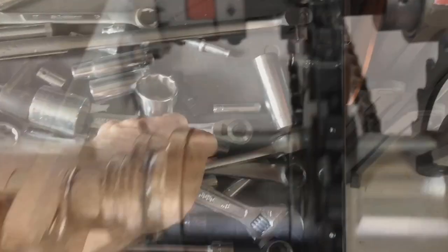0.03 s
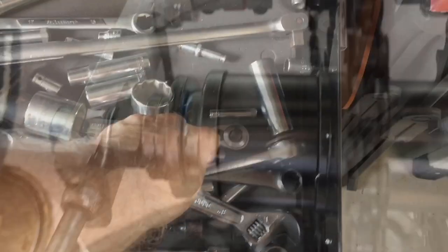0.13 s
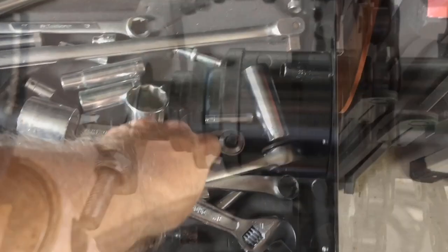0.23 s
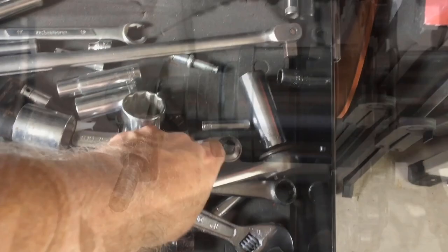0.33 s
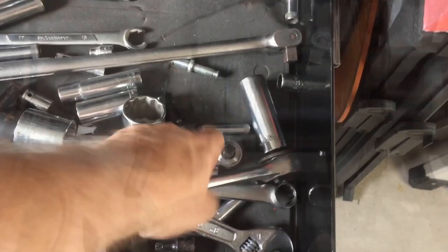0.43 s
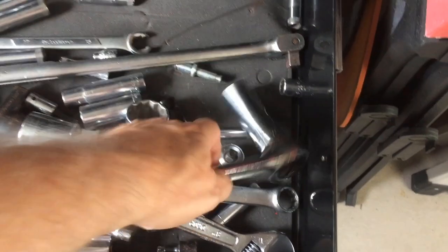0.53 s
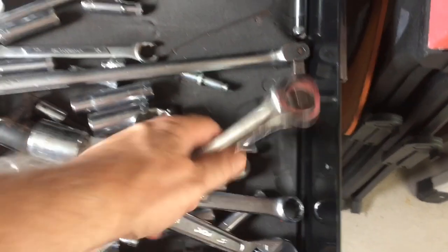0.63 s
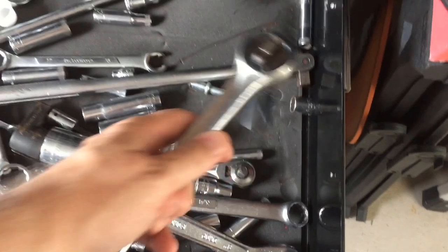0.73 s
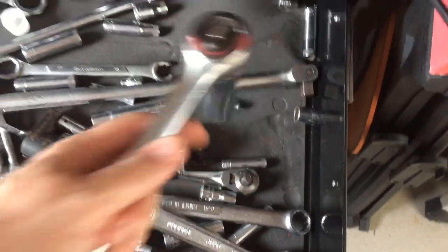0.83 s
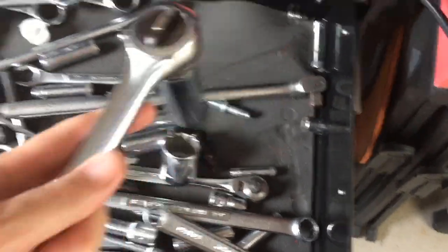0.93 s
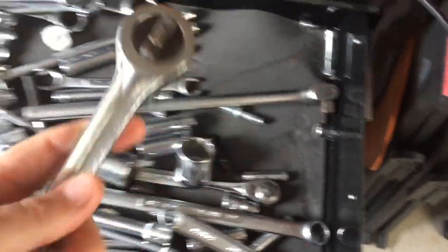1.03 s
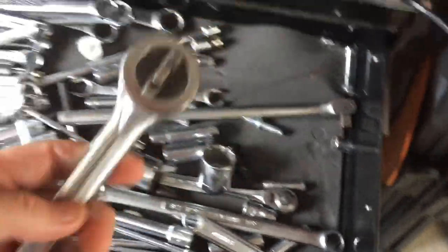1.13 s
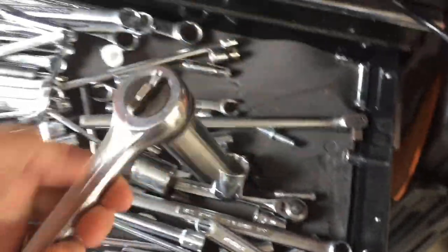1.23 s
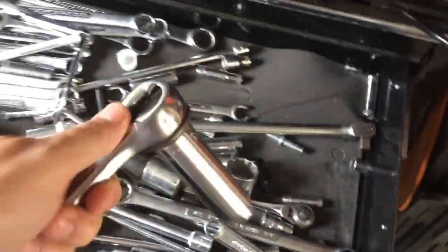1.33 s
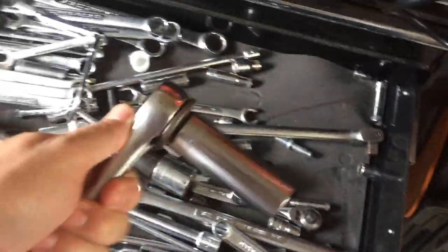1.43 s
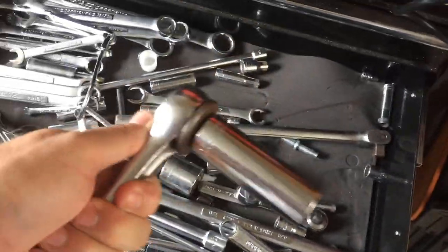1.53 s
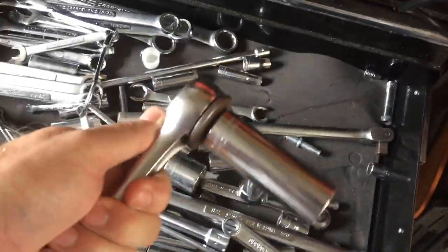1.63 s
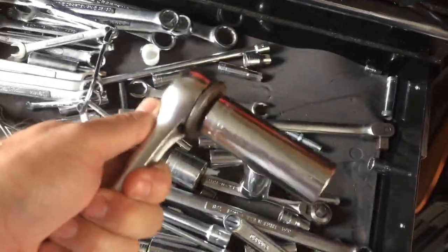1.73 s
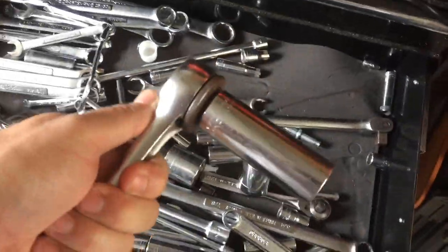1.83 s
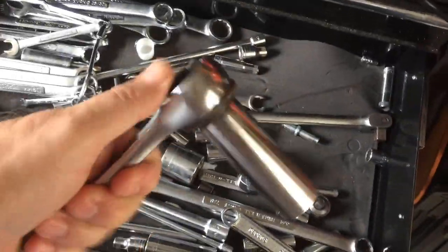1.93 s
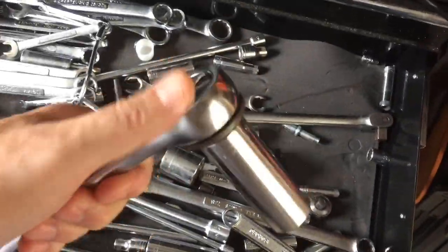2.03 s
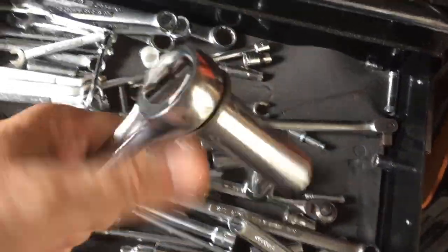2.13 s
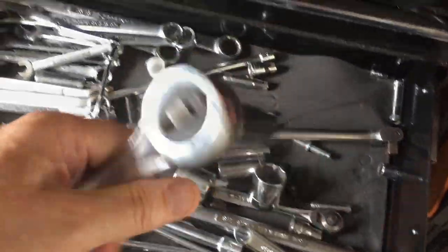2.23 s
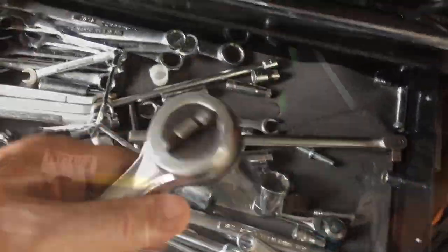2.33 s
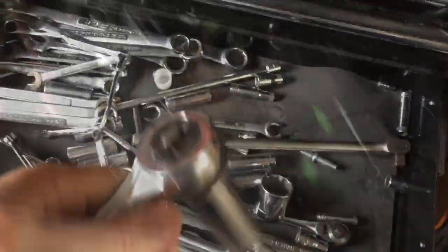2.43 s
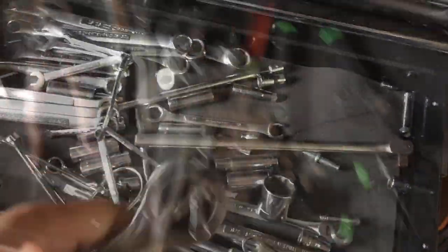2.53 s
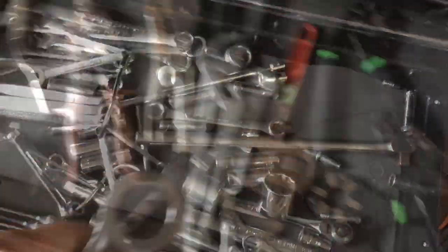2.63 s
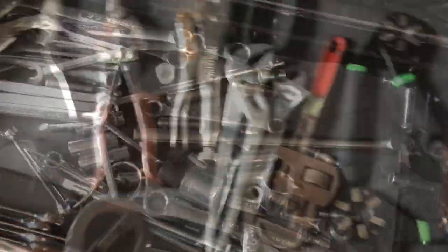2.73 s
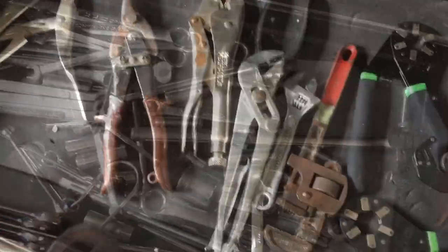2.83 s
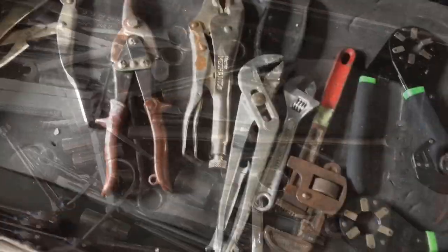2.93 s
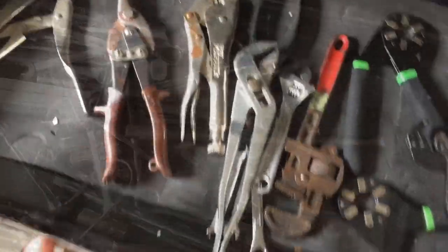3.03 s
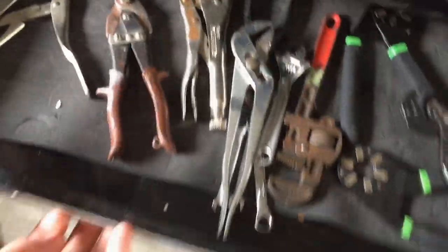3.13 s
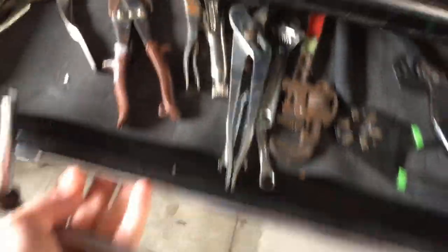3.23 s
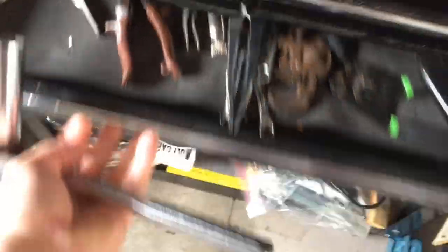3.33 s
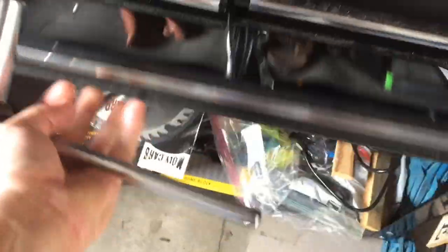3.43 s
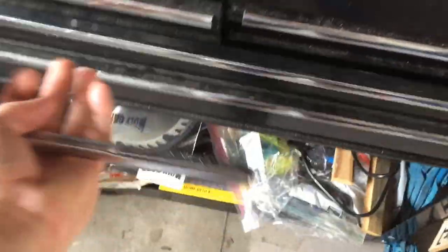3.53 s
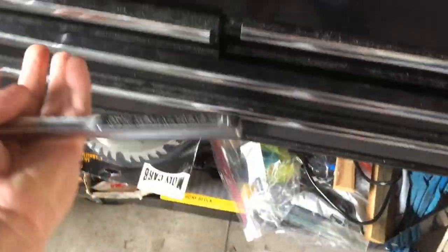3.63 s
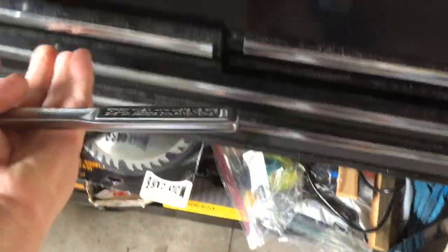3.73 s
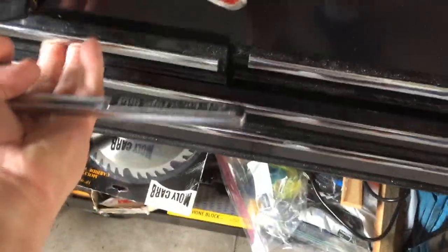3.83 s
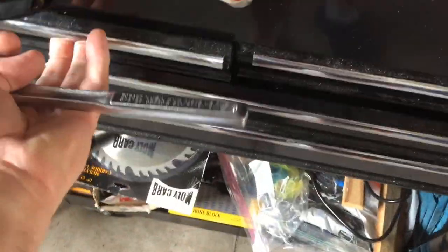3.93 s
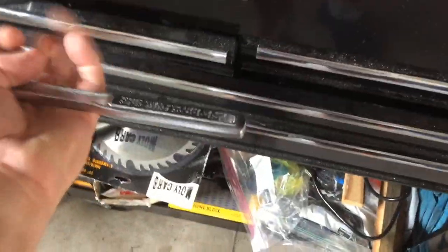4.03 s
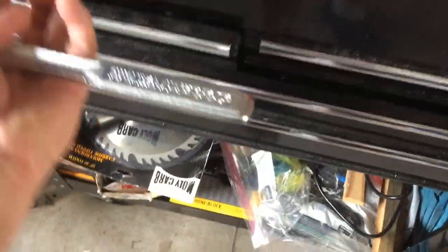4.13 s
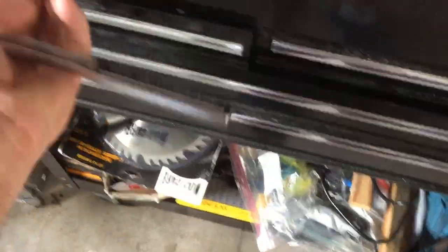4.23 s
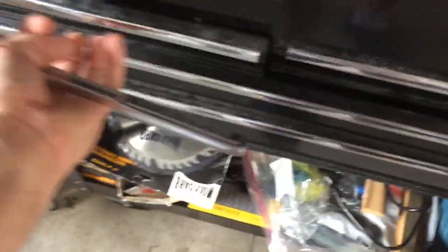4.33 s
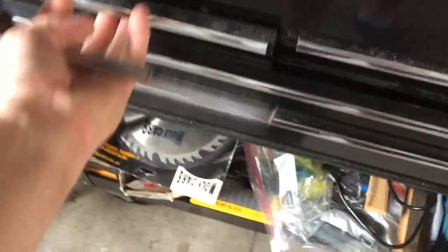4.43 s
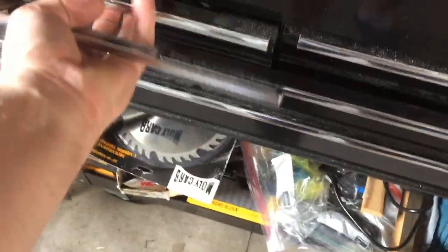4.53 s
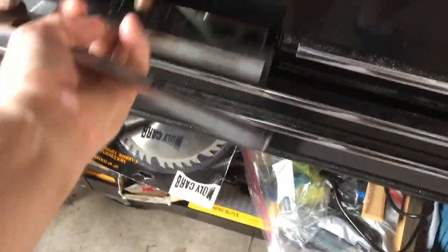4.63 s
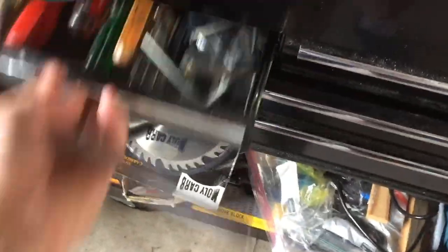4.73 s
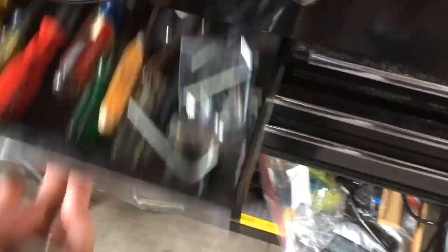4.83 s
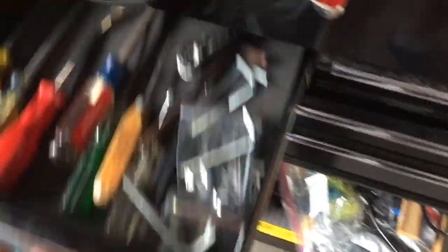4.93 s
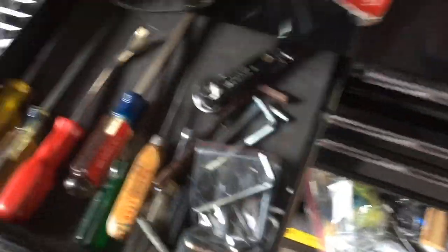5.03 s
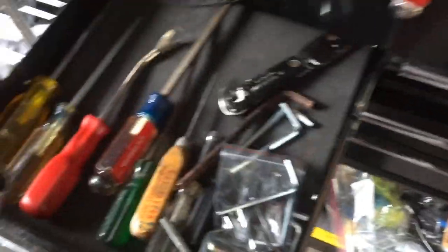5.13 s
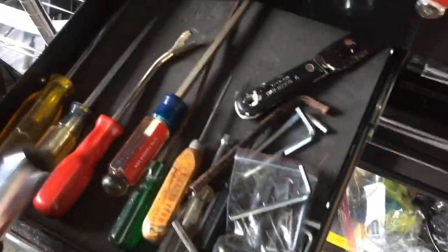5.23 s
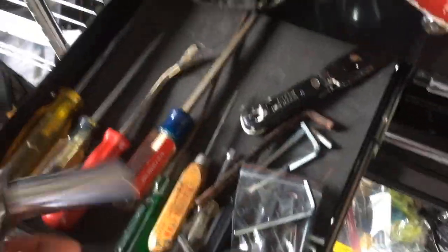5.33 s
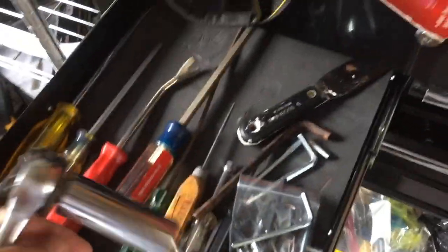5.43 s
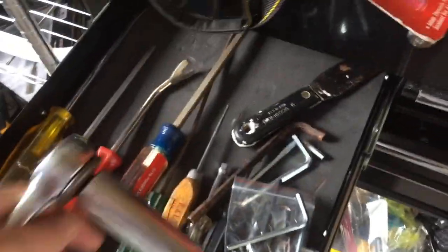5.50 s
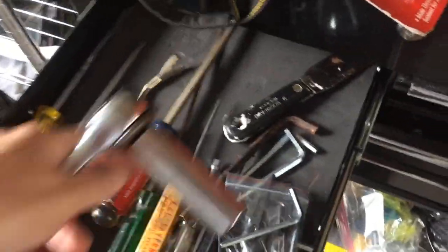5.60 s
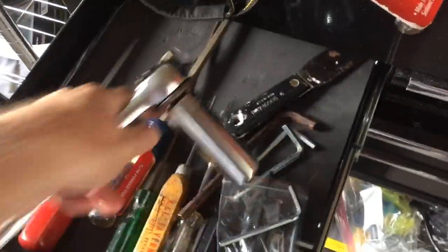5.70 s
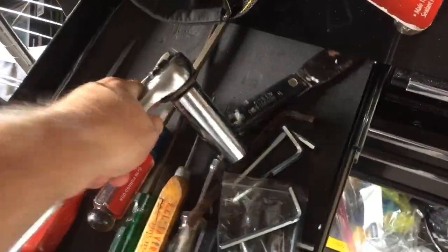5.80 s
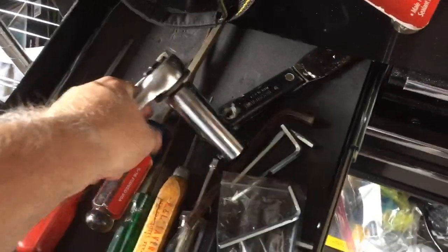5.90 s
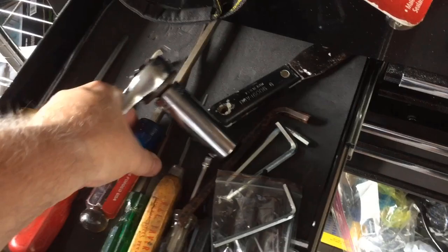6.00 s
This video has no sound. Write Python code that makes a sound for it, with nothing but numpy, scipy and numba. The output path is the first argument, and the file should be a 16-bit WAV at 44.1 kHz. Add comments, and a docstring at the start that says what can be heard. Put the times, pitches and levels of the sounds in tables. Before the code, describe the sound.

Steel tools clink and ring as one is lifted from a metal drawer, drawers rumble shut and open, then a tool clatters down.

```python
"""Tools and drawers in a garage

A hand lifts a ratchet with a long socket out of a steel tool chest, shuts one drawer, pulls another
and lays it down. Steel tools tick (short noise and scattered tones) and ring (fading sine tones).
Drawers rumble on ball runners (random knocks through resonances) and thud at their stops (low fading tones).
A small garage answers briefly with a noise echo, over a low hum and steady room tone."""
import sys
import numpy as np
from scipy import signal
from scipy.fft import rfft, irfft
from scipy.io import wavfile
from scipy.ndimage import uniform_filter1d, minimum_filter1d
from numba import njit

SR = 44100
rng = np.random.default_rng(int(sys.argv[2]) if len(sys.argv) > 2 else 0)


def dump(signal):
    """Clip the signal to [-1, 1] and save it as 16-bit WAV at the path in sys.argv[1]."""
    limited = np.clip(np.atleast_2d(signal).T, -1, 1)
    pcm = np.round(limited * 32767).astype(np.int16)
    wavfile.write(sys.argv[1], SR, pcm)


N = 267378
T = np.arange(N) / SR  # time [s]

# room tone, shape of its spectrum: (frequency [Hz], relative level per Hz [dB])
AIR_SPECTRUM = [(15, -51), (25, -27.5), (78, -5.5), (123, -5), (185, -19), (363, -21.5), (476, -31),
                (714, -37.5), (1300, -35.5), (14000, -49), (16000, -69)]
# a distant motor wavers: (frequency [Hz], width of each of two filters [Hz], rms level [dB])
HUM_BANDS = [(90.5, 15, -72.5), (124.94, 4, -63.5)]
# echo of the garage: (frequency [Hz], time to fade by 60 dB [s], level [dB])
GARAGE_BANDS = [(282, 0.22, -14), (1270, 0.2, -17), (3830, 0.27, -18), (10000, 0.46, -27.5)]
# resonances of the chest, the loose tools and the scraping steel, all three alike:
# (frequency [Hz], width before BODY_WIDENING [Hz], relative level [dB])
CHEST_BODY = [(160, 95, 7), (255, 36, 3), (385, 60, 1.5), (480, 36, 1), (648, 70, 4.5), (780, 110, -1)]
RATTLE_BODY = [(1098, 366, 16), (1499, 620, 14.5), (1980, 1200, 9), (2780, 2300, -7.5)]
SCRAPE_BODY = [(3700, 5000, 6), (7000, 5200, 1.5), (11800, 5100, -6.5)]
# drawers rolling and tools shifting in them:
# (start [s], end [s], rumble at start [dB], rumble at end [dB], rattle against rumble [dB])
DRAWER_ROLLS = [(0.0, 0.177, -53, -70.5, -12), (0.233, 0.48, -47.5, -50.5, -6.5),
                (0.628, 0.74, -67, -61, -1), (2.32, 2.474, -65, -55.5, -4), (2.458, 2.713, -45, -46, -7.5),
                (2.8, 2.908, -50.5, -57, -6.5), (2.946, 3.1, -78, -57.5, 3), (3.084, 3.532, -48, -38, -10),
                (3.808, 4.09, -40, -59.5, -9), (4.554, 4.643, -55, -50, -6),
                (4.691, 4.776, -63.5, -34.5, 1), (4.746, 4.916, -44.5, -44.5, -2.5),
                (4.896, 5.005, -39.5, -24.5, 0), (5.063, 5.226, -24.5, -50.5, -8.5),
                (5.501, 5.567, -64.5, -57, -3), (5.991, 6.039, -42, -48.5, 1)]
# steel dragged over steel: (start [s], end [s], level at start [dB], level at end [dB])
STEEL_DRAGS = [(.26, .45, -70, -70), (.52, .72, -65, -47), (2.6, 2.71, -69, -59.5), (2.815, 2.89, -44, -61),
               (3.13, 3.185, -41, -56), (3.22, 3.49, -73, -65), (3.65, 3.75, -23.5, -41.5),
               (3.8, 4.1, -61, -62.5), (4.69, 4.76, -60, -47.5), (4.76, 4.9, -40, -65),
               (4.91, 5.22, -37.5, -63.5)]
# blows on the sheet-steel drawers:
# (time [s], level [dB], pitch [Hz], 60 dB fade, at least 0.02 used [s], shake-up of the contents [dB])
DRAWER_THUDS = [(0.477, -11, 281, 0.016, -36.5), (0.729, -14.5, 241, 0.052, -28),
                (0.744, -9.5, 208.5, 0.035, -41.5), (2.496, -32, 167, 0.045, -52.5),
                (2.71, -18, 155.8, 0.14, -28.5), (2.979, -32.5, 315, 0.038, -57),
                (3.509, -7.5, 155.7, 0.055, -27), (3.583, -28, 188, 0.17, -36),
                (3.651, -15.5, 247, 0.041, -30.5), (3.683, -26.5, 127.2, 0.66, -32.5),
                (3.71, -22, 169.5, 0.25, -27), (3.765, -24, 173.5, 0.078, -38),
                (4.094, -11.5, 172.4, 0.045, -41), (4.126, -32, 182, 0.14, -38.5),
                (4.633, -17, 169, 0.079, -49), (4.904, -16.5, 363, 0.11, -33.5),
                (4.94, -23, 467, 0.34, -44), (4.995, -6.5, 198.5, 0.058, -32.5),
                (5.021, -21.5, 191.3, 0.31, -26), (5.865, -13, 179.3, 0.052, -27.5),
                (5.909, -10, 204, 0.053, -33)]
# modes of a drawer panel: (ratio to the pitch [1], level [dB])
PANEL_MODES = [(0.448, -18.5), (1.002, 0), (1.448, -5.5), (2.098, -14), (2.899, -18), (4.1, -14.5)]
# the crack of steel on steel: (time [s], level [dB], centre [Hz], 60 dB fade, at least 0.01 used [s])
STEEL_TICKS = [(0.1313, -57.5, 2920, 0.051), (0.177, -53, 3330, 0.017), (0.261, -29.5, 3176, 0.09),
               (0.307, -40.5, 4040, 0.052), (0.3274, -44, 3230, 0.16), (0.364, -45.5, 4930, 0.14),
               (0.4566, -38.5, 2770, 0.28), (0.463, -43, 7000, 0.063), (0.478, -29, 5860, 0.081),
               (0.7266, -20, 5500, 0.03), (0.7388, -19, 9500, 0.025), (0.74, -21, 3715, 0.1),
               (1.118, -58, 2160, 0.092), (1.1322, -49, 3770, 0.0088), (1.428, -40.5, 5160, 0.019),
               (1.444, -50.5, 7100, 0.02), (2.493, -50, 4180, 0.027), (2.582, -46.5, 2520, 0.019),
               (2.5959, -35.5, 3390, 0.027), (2.6677, -42, 3400, 0.036), (2.71, -36.5, 5740, 0.13),
               (2.817, -50.5, 9670, 0.1), (2.983, -58, 2910, 0.052), (3.022, -56.5, 8900, 0.08),
               (3.092, -50, 5890, 0.13), (3.197, -45.5, 12360, 0.061), (3.465, -52.5, 2490, 0.036),
               (3.4954, -30.5, 6160, 0.13), (3.5118, -28.5, 4950, 0.06), (3.584, -45, 2600, 0.024),
               (3.651, -37.5, 2670, 0.072), (3.708, -27.5, 2900, 0.044), (3.795, -45.5, 9600, 0.041),
               (3.8643, -50, 9000, 0.19), (4.016, -37, 5770, 0.022), (4.078, -50, 2170, 0.077),
               (4.091, -51, 8600, 0.02), (4.129, -39.5, 5800, 0.02), (4.1364, -33, 8100, 0.016),
               (4.305, -52, 5500, 0.021), (4.585, -48, 7170, 0.018), (4.6373, -52.5, 4460, 0.041),
               (4.763, -36, 7660, 0.059), (4.913, -34, 1770, 0.37), (4.993, -22.5, 8600, 0.021),
               (5.8662, -18, 6430, 0.04), (5.9089, -23, 2820, 0.056), (5.922, -27, 5340, 0.018),
               (6.0175, -47, 4500, 0.029)]
# what each tool rings with: (frequency [Hz], level [dB], time to fade by 60 dB at damping factor 1 [s])
TOOL_MODES = { "socket": [(8447, -9, .33), (8490, 1, .06), (4600, -21, .05), (12385, -11, .1),
              (12295, -19, .13), (14500, -28, .12), (14810, -15, .05), (9383, -27, .2)],
              "ratchet": [(1190, -3, .04), (2350, -3, .05), (1895, -10, .06), (3980, 0, .1),
              (6240, -6, .17), (8452, -17, .4), (9270, -5, .05), (12390, -16, .15)],
              "long wrench": [(1880, -6, .09), (2223, -2, .2), (3171, -3, .12), (3246, -9, .18),
              (4517, -5, .24), (4590, -5, .14), (3420, -11, .23), (6245, -14, .45), (8296, -20, .4),
              (8608, -9, .25), (10340, -20, .2), (10870, -32, .8), (11460, -22, .33), (12380, 6, .12),
              (12880, -15, .2), (13680, -26, .4), (13885, -20, .45)], "hex keys": [(2756, 0, .14),
              (4016, 0, .07), (5050, -28, .55), (9184, -16, .13), (9776, -23, .26), (10710, -33, .4),
              (12168, -13, .38), (12330, 2, .055), (13111, -11, .44), (14660, -20, .17)],
              "steel shaft": [(7779, -10, .3), (8472, -1, .17), (8597, 0, .22)],
              "short wrench": [(2245, -4, .1), (3770, -9, .08), (4995, 0, .06), (6218, -14, .15),
              (8371, 4, .13), (9453, -4, .04), (12965, -14, .12), (13680, -15, .11)],
              "extension bar": [(3558, -11, .2), (3946, -14, .3), (4124, -10, .5), (5459, -4, .14),
              (6089, 0, .08), (6993, -6, .13), (8834, -9, .17), (10380, -9, .16), (11770, -2, .07)],
              "drawer handle": [(1233, -4, .4), (2970, 2, .09), (4124, -2, .25), (5460, -1, .15),
              (6896, -7, .2), (8619, -9, .3)], "screwdriver": [(9780, 0, .2)],
              "loose bit": [(10090, 4, .06), (11310, 0, .12)], "drawer liner": [(711, -4, .15),
              (926, -8, .16), (1357, -10, .15), (1497, -4, .12), (1669, 0, .08)], "pawl": [(2000, 3, .035),
              (2400, 1, .05), (3960, 1, .05), (5400, -5, .03)], }
# blows that leave each tool ringing; damping divides the fade time: above 1 shorter, below 1 longer
# (time [s], level [dB], brightness around 4 kHz [dB per octave], damping factor [1])
TOOL_BLOWS = { "socket": [(.7264, 2.5, -3.5, 0.6), (.7392, -14, 4, 2.5)], "ratchet": [(1.133, -46.5, -2, 1),
              (1.23, -53.5, -6, 2.2), (1.314, -66, -1, 0.99), (1.372, -45.5, 0, 2.24),
              (4.102, -37.5, -4.5, 2.6), (4.197, -39.5, 11, 3.9), (4.215, -39, 3.5, 2.6),
              (4.316, -40.5, 2.5, 1.9), (4.511, -70, -13, 1.3), (5.625, -46.5, -0.5, 1.62)],
              "long wrench": [(.3623, -39, -3.5, 1.5), (.7388, -20.5, 0.5, 0.83)],
              "hex keys": [(5.8672, -16, 5.5, 0.93)], "steel shaft": [(5.8668, -4, -4, 1.3)],
              "short wrench": [(.2618, -28.5, -1, 0.93)], "extension bar": [(.4782, -31, -1, 1.0)],
              "loose bit": [(4.881, -54, 1.5, 0.44)], "drawer handle": [(3.924, -49, 0, 0.45),
              (4.016, -41, -0.5, 3.5)], "screwdriver": [(5.004, -29.5, -5.5, 0.79)],
              "drawer liner": [(5.911, -17, 0, 1.33)], "pawl": [(1.4285, -43, 0, 1.3), (1.446, -55, 1, .9)],
              }
# a touch that stifles the ring: (time [s], loss [dB])
TOOL_TOUCHES = {"socket": [(.81, 17)], "drawer handle": [(4.012, 9)], "steel shaft": [(5.92, 7)]}
# tools lying loose against others buzz, which smears each mode: (depth in the bass [1], width [Hz])
TOOL_BUZZ = {"long wrench": (.7, 70), "ratchet": (.9, 130), "extension bar": (.4, 40),
             "drawer liner": (.7, 120), "drawer handle": (.5, 45), "short wrench": (.8, 90)}

AIR_DB = -58  # rms level of the room tone
ECHO_RISE_S = 0.00058
BODY_WIDENING = 1.38
WANDER_DB, WANDER_S = 2.5, .06  # random gain of each resonance, and the time between its steps
STROKE_RISE_S, STROKE_T60_S = 0.03, 0.079
SHAKE_RISE_S, SHAKE_T60_S = 0.013, 0.22
SHAKE_RATTLE_DB, SHAKE_SCRAPE_DB = -3, -13.5  # against the rumble
RUMBLE_SPREAD_DB, RATTLE_SPREAD_DB, SCRAPE_SPREAD_DB = 1.4, 1.8, 2.0
PUSH_S = 0.00603  # softness of a thud
CHEST_LOW_HZ, TICK_LOW_HZ = 69.9, 900  # cut below these
TOUCH_S = 0.008  # time a touch takes to work
BUZZ_TOP_HZ = 7520  # the buzz has half its depth here
CEILING, RELEASE_S = .66, .004  # limiter
TOP_HZ = 16000


def undb(db):
    """Turn decibels into a gain."""
    return 10 ** (np.asarray(db) / 20)


def unit(x):
    """Scale to an rms level of 1."""
    return x / np.sqrt(np.mean(x ** 2))


def fade(t, t60):
    """Exponential decay that drops by 60 dB in t60 seconds."""
    return np.exp(-np.log(1000) * t / t60)


def band(x, hz, width_hz):
    """Resonance with gain 1 at the centre."""
    sharpness = max(hz / width_hz, .3)
    b, a = signal.iirpeak(min(hz, .4 * SR), sharpness, SR)
    return signal.lfilter(b, a, x)


def highpass(x, order, hz):
    """Remove the sound below a frequency."""
    return signal.sosfilt(signal.butter(order, hz, "high", fs=SR, output="sos"), x)


def add(out, s, x):
    """Mix a sound in at s seconds."""
    i = int(s * SR)
    out[i:i + len(x)] += x[:N - i]


def air():
    """Steady room tone of shaped noise, with two wavering hum bands of narrow noise."""
    hz, db = np.transpose(AIR_SPECTRUM)
    f = np.fft.rfftfreq(N, 1 / SR) + 1  # 1 Hz up, so that the logarithm exists
    shape = undb(np.interp(np.log(f), np.log(hz), db))
    out = unit(irfft(rfft(rng.standard_normal(N)) * shape, N)) * undb(AIR_DB)
    for hum_hz, width_hz, hum_db in HUM_BANDS:
        hum = band(band(rng.standard_normal(N), hum_hz, width_hz), hum_hz, width_hz)
        out = out + undb(hum_db) * unit(hum)
    return out


def garage(x):
    """Diffuse noise echo that builds up at once; each band fades at its own pace, the top treble slowest."""
    t = T[:SR // 2]
    tail = 0
    for hz, t60, db in GARAGE_BANDS:
        noise = band(rng.standard_normal(len(t)), hz, 0.83 * hz)
        tail = tail + undb(db) * unit(noise * fade(t, t60))
    echo = tail * np.clip(t / ECHO_RISE_S, 0, 1) / np.sqrt(len(t))
    return signal.fftconvolve(x, echo)[:N]


def grit(rate, spread_db):
    """Random tiny knocks of uneven size, about `rate` of them a second."""
    hits = rng.random(N) < rate / SR
    extra = np.minimum(rng.exponential(size=N), 4)
    return hits * rng.standard_normal(N) * undb(spread_db * extra)


def wander():
    """Slow random gain, as the load shifts."""
    knots = np.arange(0, T[-1] + 1, WANDER_S)
    return np.interp(T, knots, undb(WANDER_DB * rng.standard_normal(len(knots))))


def strokes(rows):
    """Power over time of movements that set in quickly, drift from one level to another and die away."""
    power = 0
    for start, end, start_db, end_db in rows:
        level = undb(np.interp(T, [start, end], [start_db, end_db]))
        rise = np.clip((T - start) / STROKE_RISE_S, 0, 1)
        fall = fade(np.maximum(T - end, 0), STROKE_T60_S)
        power = power + (level * rise * fall) ** 2
    return power


def shakes():
    """Power over time of the loose contents that every thud throws about."""
    power = 0
    for s, *_, db in DRAWER_THUDS:
        rise = np.clip((T - s) / SHAKE_RISE_S, 0, 1)
        fall = fade(np.maximum(T - s - SHAKE_RISE_S, 0), SHAKE_T60_S)
        power = power + (undb(db) * rise * fall) ** 2
    return power


def slide_layer(modes, knocks, power):
    """Knocks set off resonances that swell and sink on their own, under a shared power curve."""
    body = 0
    for hz, width_hz, db in modes:
        wide_hz = BODY_WIDENING * width_hz
        resonance = band(band(knocks, hz, wide_hz), hz, wide_hz)
        body = body + undb(db) * wander() * resonance
    return np.sqrt(power) * unit(body)


def slides():
    """Balls and loose tools knock densely on the chest; its body rumbles, the tools rattle and scrape."""
    shaken = shakes()
    rumble_power = strokes([row[:4] for row in DRAWER_ROLLS]) + shaken
    rattle_rows = [(a, b, db_a + d, db_b + d) for a, b, db_a, db_b, d in DRAWER_ROLLS]
    rattle_power = strokes(rattle_rows) + undb(2 * SHAKE_RATTLE_DB) * shaken
    scrape_power = strokes(STEEL_DRAGS) + undb(2 * SHAKE_SCRAPE_DB) * shaken
    rumble = slide_layer(CHEST_BODY, grit(1200, RUMBLE_SPREAD_DB), rumble_power)
    rattle = slide_layer(RATTLE_BODY, grit(900, RATTLE_SPREAD_DB), rattle_power)
    scrape = slide_layer(SCRAPE_BODY, grit(9000, SCRAPE_SPREAD_DB), scrape_power)
    return rumble + rattle + scrape


def thuds():
    """A soft push of a few ms sets the panel modes going; the higher ones die sooner."""
    out, t = np.zeros(N), T[:SR // 2]
    ratio, mode_db = np.transpose(PANEL_MODES)[:, :, None]
    push = 1 - np.exp(-t / PUSH_S)
    for s, thud_db, hz, t60, _ in DRAWER_THUDS:
        detune = 1 + .05 * rng.standard_normal(ratio.shape)
        decay = fade(t, max(t60, .02) / ratio ** 0.3)
        modes = undb(mode_db) * decay * np.sin(2 * np.pi * hz * ratio * detune * t)
        add(out, s, undb(thud_db) * modes.sum(axis=0) * push)
    return out


def ticks(count=30):
    """A hard broad click, short modes scattered round the centre and a hiss like many denser ones."""
    out, t = np.zeros(N), T[:SR // 5]
    for s, db, hz, t60 in STEEL_TICKS:
        noise, t60 = rng.standard_normal(len(t)), max(t60, .01)
        click = band(noise, 1.5 * hz, min(2.6 * hz, SR / 3))
        click = band(click, hz, min(2 * hz, SR / 3)) * fade(t, .006)

        spread, size, life = rng.standard_normal((3, count, 1))
        pitch = hz * np.exp(.42 * np.tanh(spread / 2) * 2)  # tanh keeps strays near the centre
        tones = np.sin(2 * np.pi * np.minimum(pitch, .4 * SR) * t)
        decay = fade(t, .7 * t60 * np.exp(.3 * life))
        modes = np.sum(undb(3 * size) * decay * tones, axis=0)

        hiss = band(band(noise, hz, 0.56 * hz), hz, min(2.1 * hz, SR / 3))
        hiss = unit(hiss) * fade(t, t60)
        add(out, s, undb(db) * (0.1 * click + 0.24 * modes + 1.22 * hiss))
    return highpass(out, 2, TICK_LOW_HZ)


def buzz(name, hz, count):
    """Random wobble of each mode's strength, weaker in the treble."""
    depth, width_hz = TOOL_BUZZ[name]
    b, a = signal.butter(1, width_hz, fs=SR)
    wobble = unit(signal.lfilter(b, a, rng.standard_normal((len(hz), count))))
    return (1 + depth * wobble / (1 + (hz / BUZZ_TOP_HZ) ** 2)) / np.hypot(1, depth)


def tools():
    """Each blow starts all modes of its tool; a later touch takes energy out."""
    out, t = np.zeros(N), T[:SR // 2 + SR // 4]
    for name, blows in TOOL_BLOWS.items():
        hz, db, t60 = np.transpose(TOOL_MODES[name])[:, :, None]
        for s, blow_db, tilt_db, damping in blows:
            size = undb(db + tilt_db * np.log2(hz / 4000))
            if name in TOOL_BUZZ:
                size = size * buzz(name, hz, len(t))
            decay = fade(t, t60 / max(damping, .3))
            ring = np.sum(size * decay * np.sin(2 * np.pi * hz * t), axis=0)
            loss_db = 0
            for touch_s, touch_db in TOOL_TOUCHES.get(name, []):
                if touch_s > s:
                    loss_db = loss_db + touch_db * np.clip((s + t - touch_s) / TOUCH_S, 0, 1)
            add(out, s, ring * undb(blow_db - loss_db))
    return out


def scene():
    """Tools and chest close by, their echo, and the air of the garage."""
    # the chest is too small to radiate deep bass
    chest = highpass(thuds() + slides(), 3, CHEST_LOW_HZ)
    near = tools() + ticks() + chest
    return (near + garage(near) + air())[None]


@njit
def follow(x, keep):
    """Peak level that jumps up at once and sinks more slowly."""
    e, out = 0., np.empty(len(x))
    for i in range(len(x)):
        e = max(x[i], e * keep)
        out[i] = e
    return out


def record(dry):
    """A limiter looks 1 ms ahead, turns peaks down to the ceiling and lets go within a few ms; the top is cut."""
    ahead = -minimum_filter1d(-np.abs(dry[0]), size=89)  # highest peak within 1 ms to either side
    peak = follow(ahead, np.exp(-1 / (RELEASE_S * SR)))
    gain = CEILING / np.maximum(peak, CEILING)
    held = dry * uniform_filter1d(gain, size=45)  # gain smoothed over 1 ms
    top_cut = signal.ellip(8, .2, 70, TOP_HZ, fs=SR, output="sos")
    return signal.sosfilt(top_cut, held)


dry = scene()
out = record(dry)
dump(out)
```